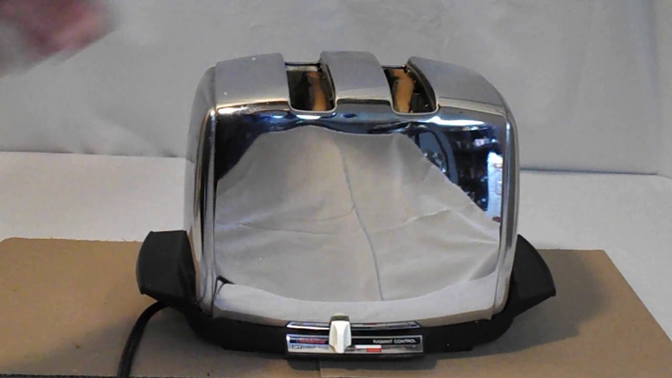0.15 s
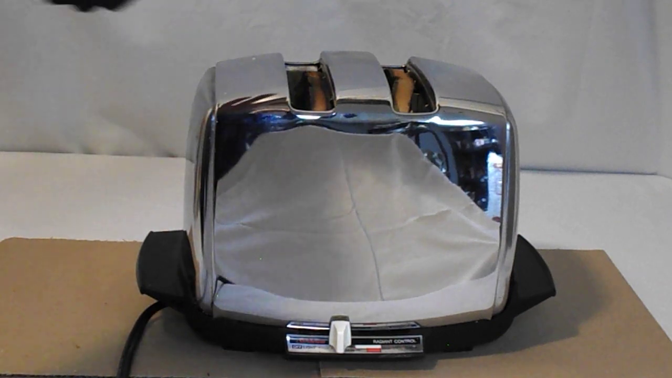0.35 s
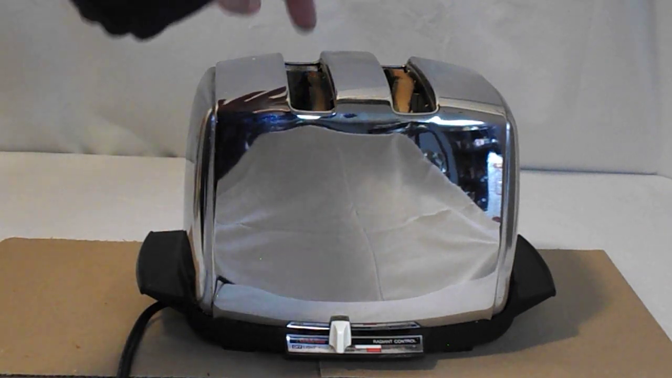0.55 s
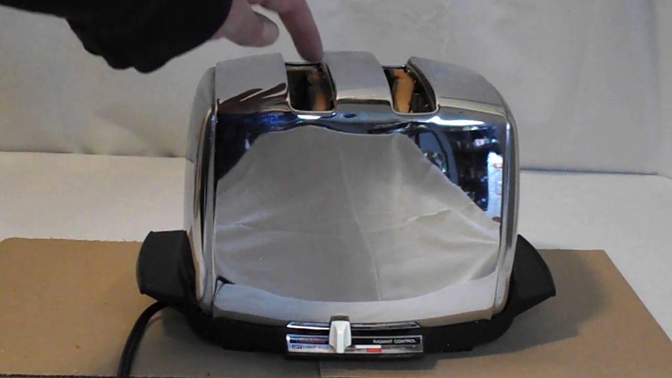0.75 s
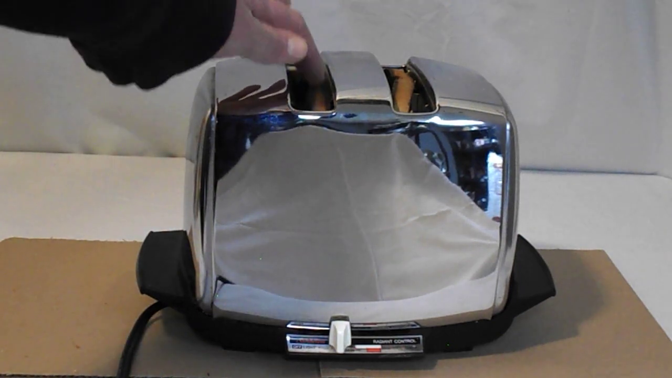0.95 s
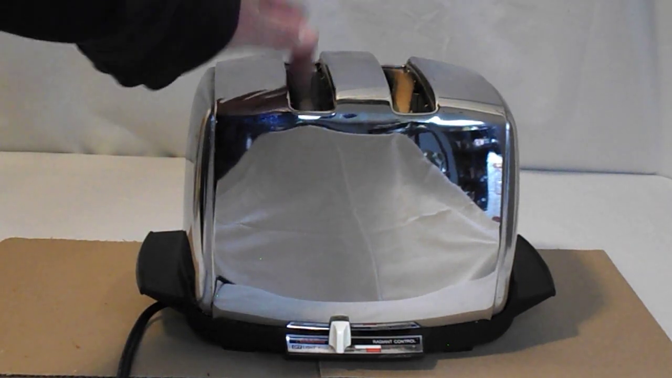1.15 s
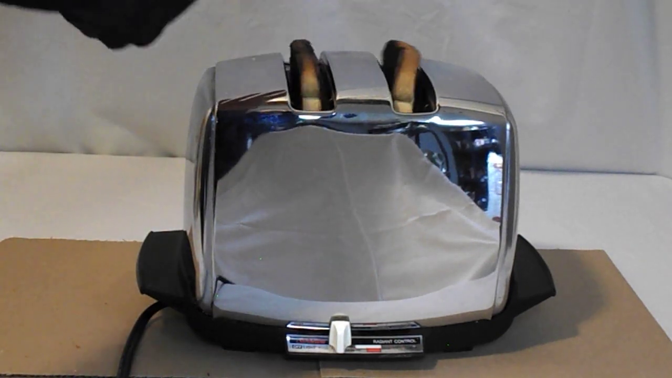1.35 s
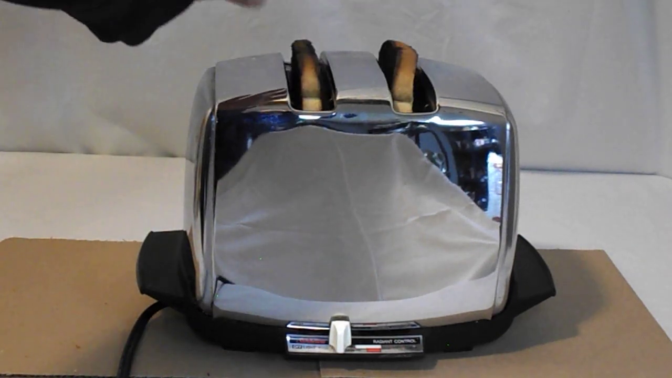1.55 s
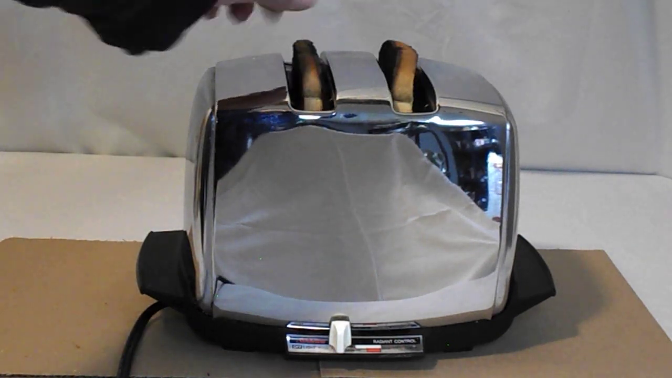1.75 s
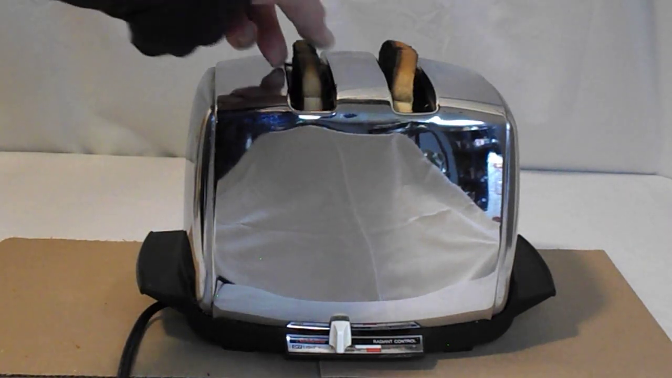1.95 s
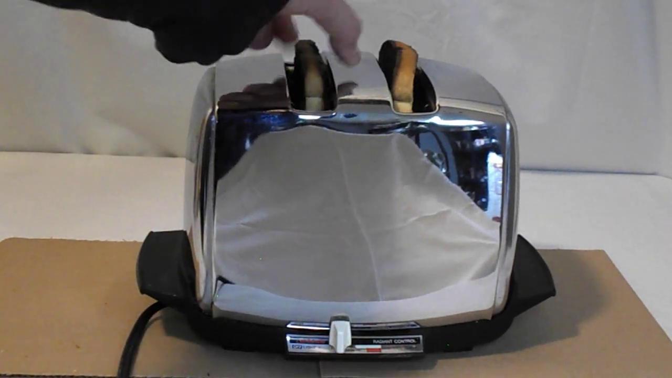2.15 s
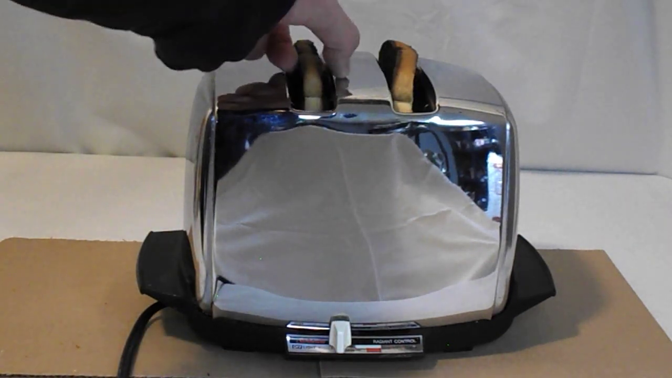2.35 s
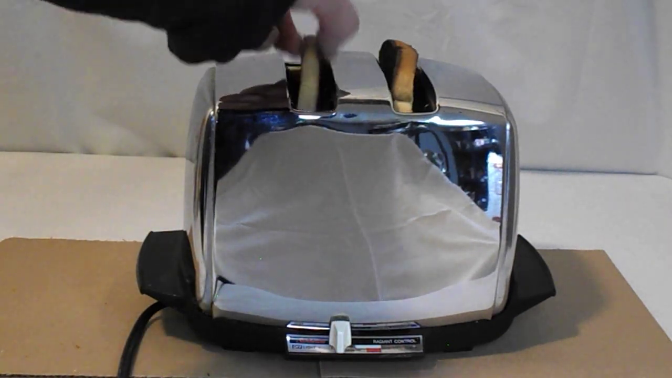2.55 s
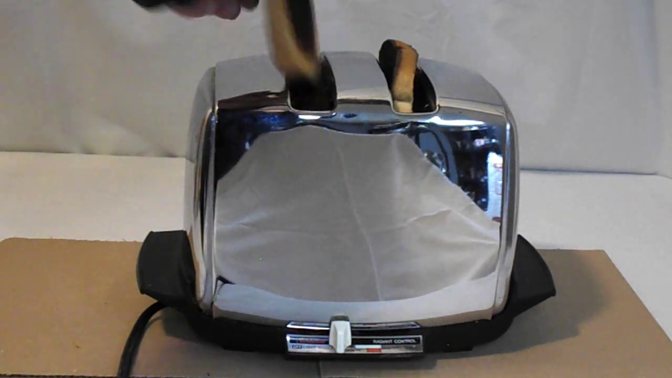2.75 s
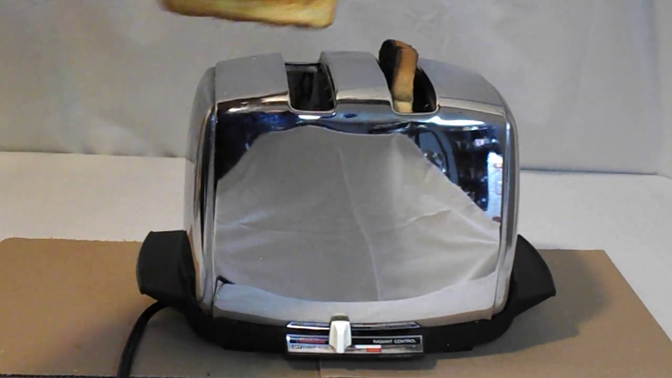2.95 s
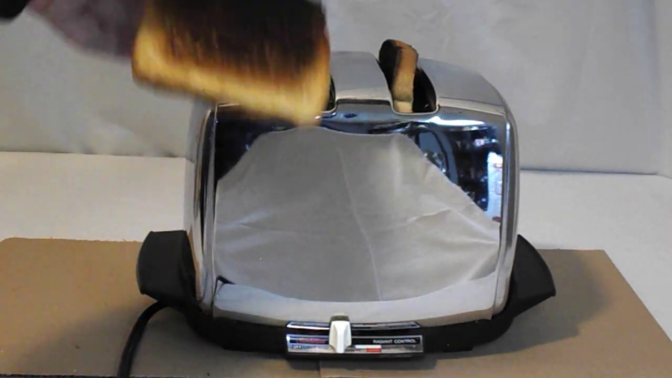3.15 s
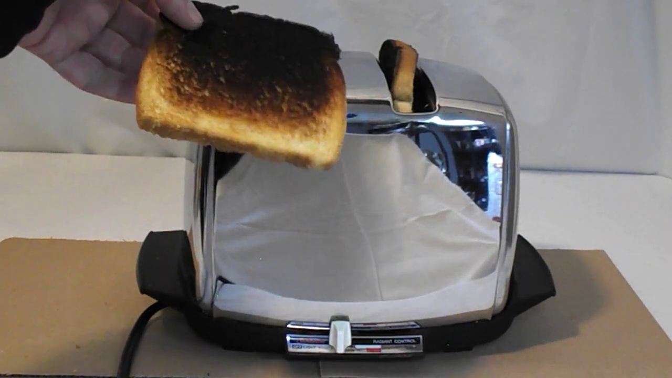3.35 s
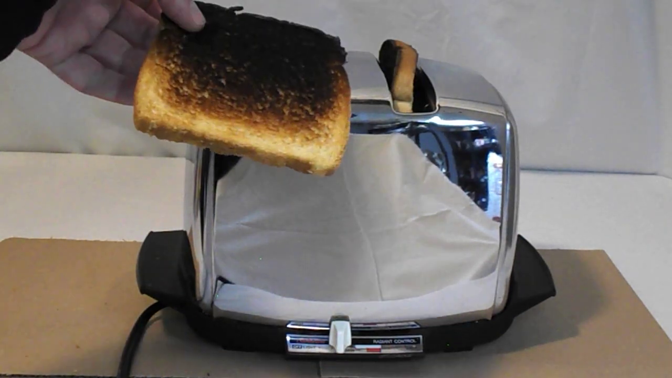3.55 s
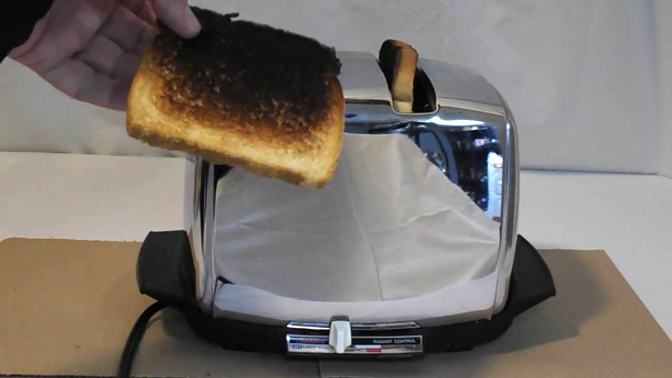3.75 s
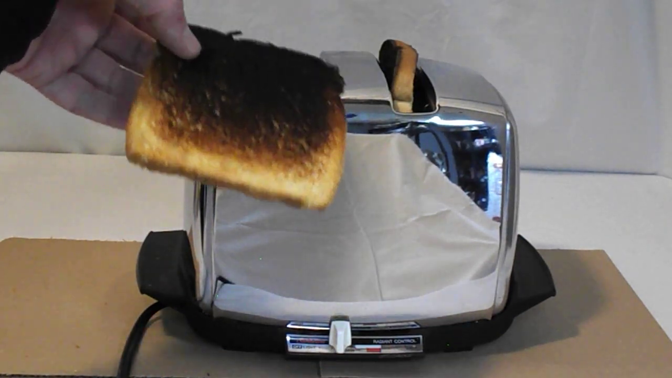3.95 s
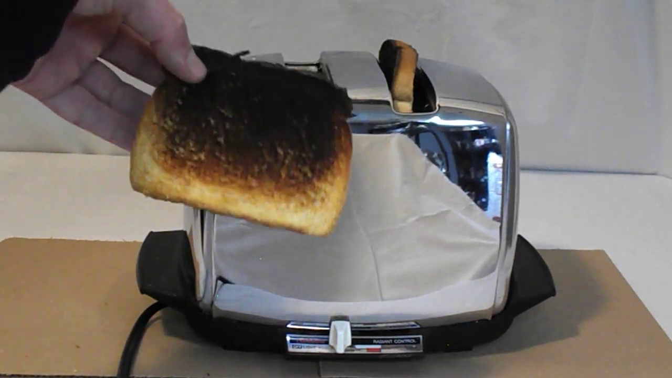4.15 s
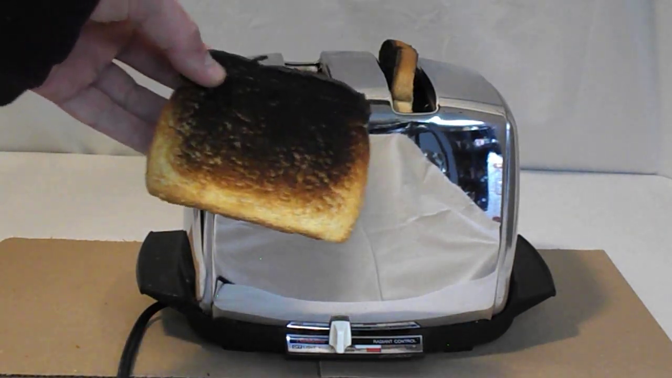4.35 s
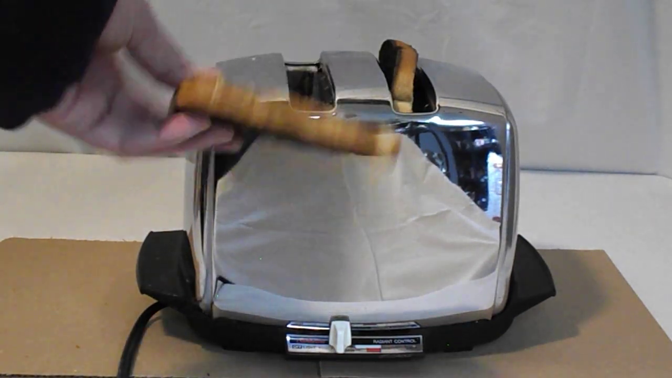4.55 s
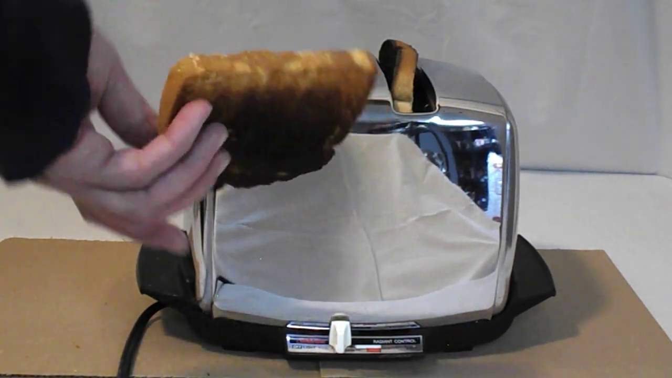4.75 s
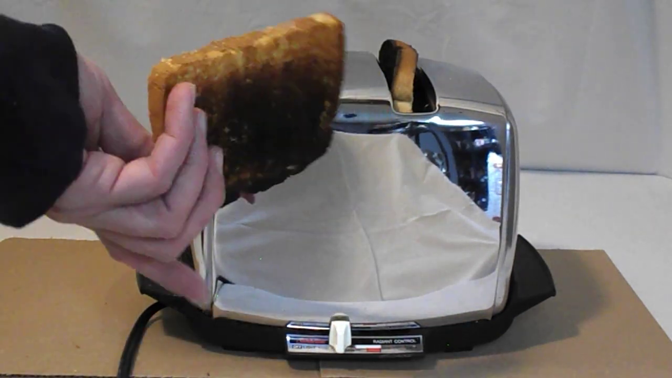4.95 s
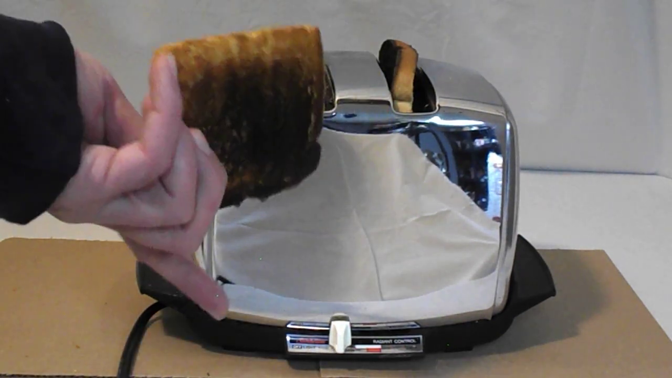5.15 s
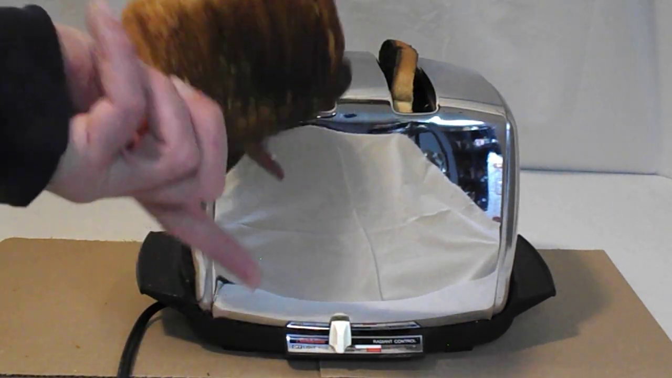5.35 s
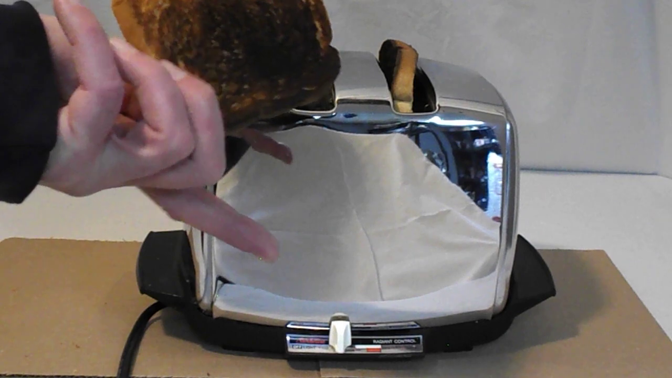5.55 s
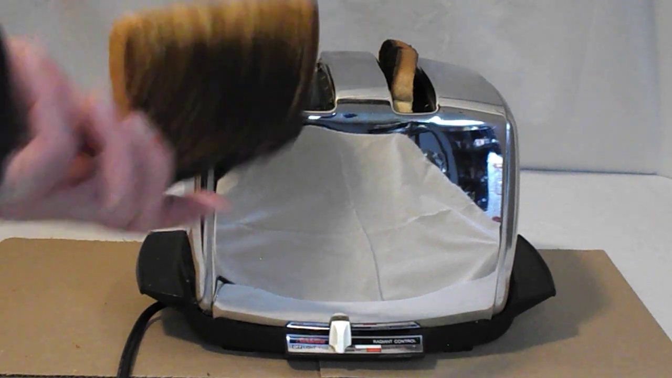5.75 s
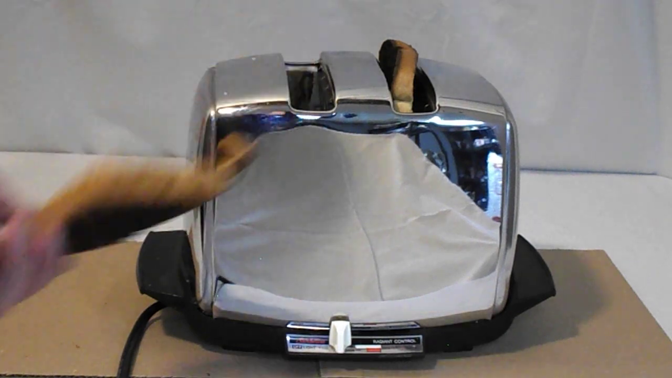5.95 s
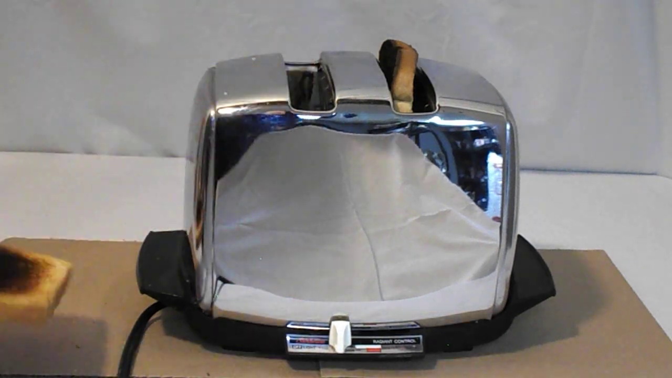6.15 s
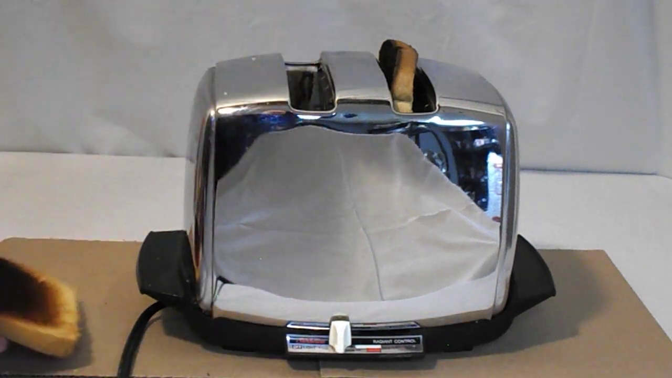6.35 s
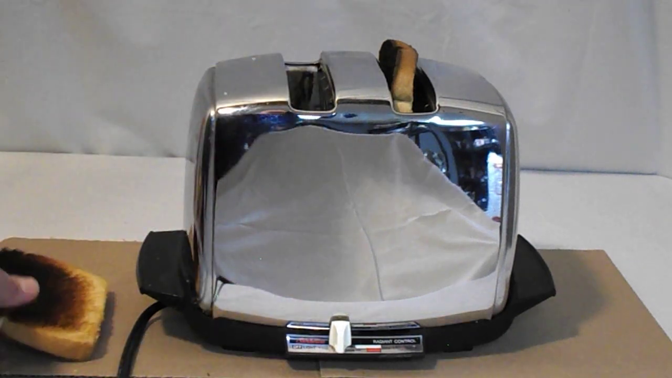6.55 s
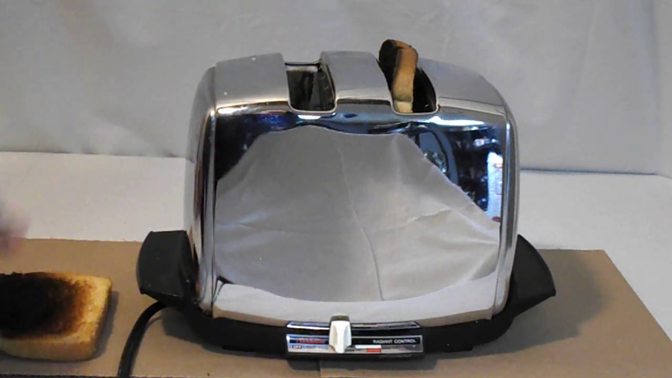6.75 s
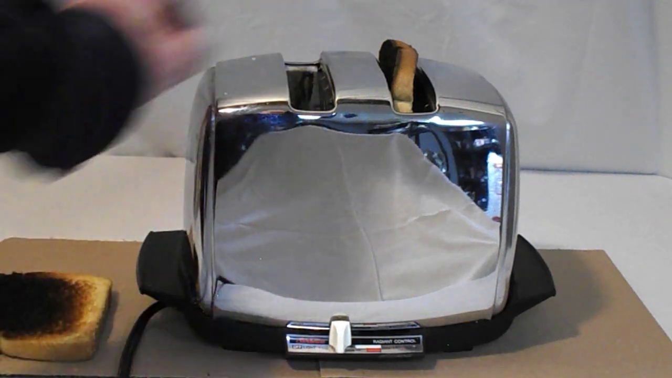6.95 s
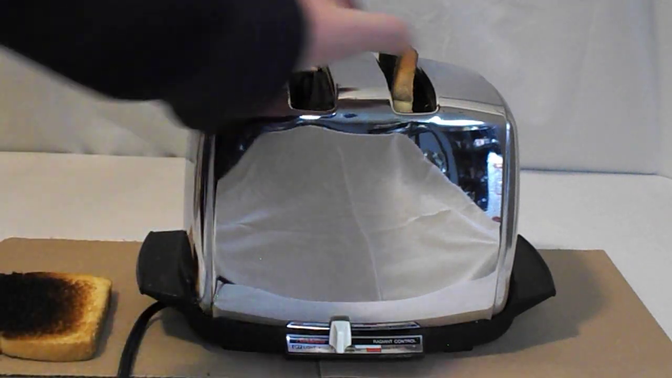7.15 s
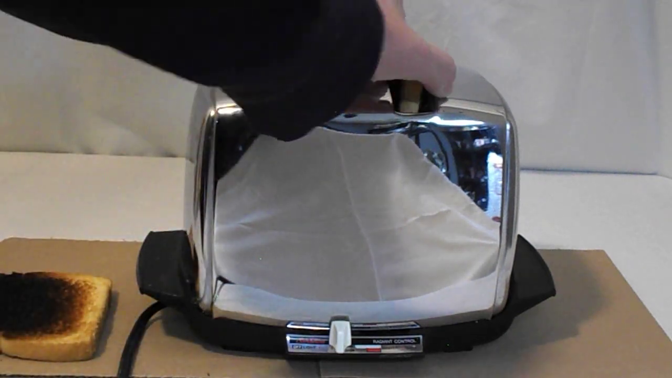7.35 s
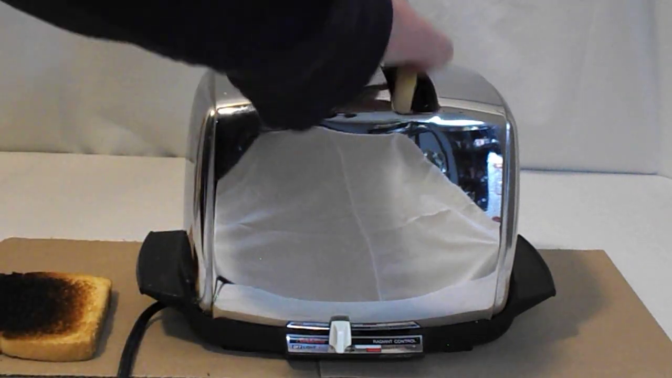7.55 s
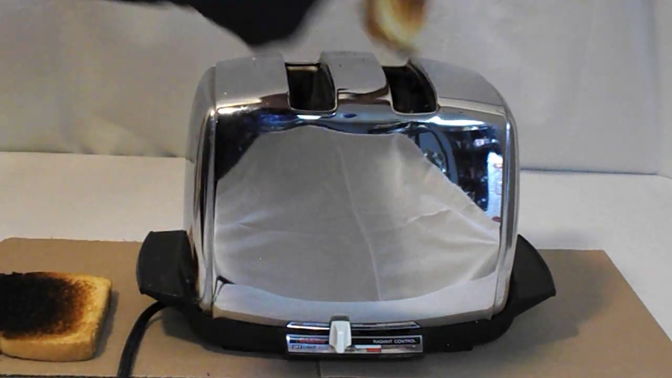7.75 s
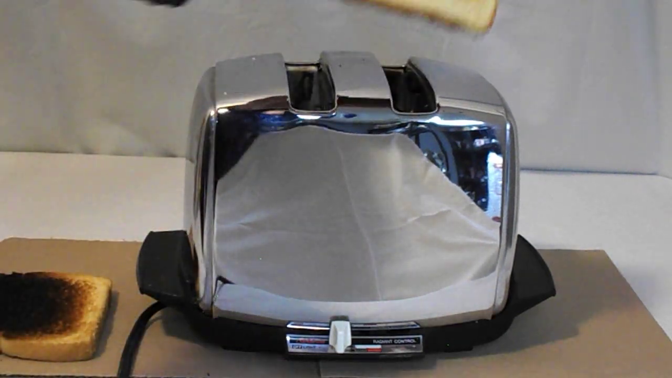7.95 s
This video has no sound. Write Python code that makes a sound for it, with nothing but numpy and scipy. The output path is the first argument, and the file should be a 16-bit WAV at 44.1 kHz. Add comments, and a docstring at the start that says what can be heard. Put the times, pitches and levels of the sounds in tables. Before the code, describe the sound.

In a small quiet room, close to the microphone, a metal toaster releases with a click and a bright squeaky rattle. A slice is knocked, scraped softly out of its wire slot, brushes the shell with a thin ring, and crackles in the fingers. It clacks and slaps onto cardboard with a dull thud, then a second slice scrapes out faster. Faint air noise and hum remain.

```python
"""A chrome toaster on a sheet of cardboard in a small quiet room: grains of rubbing drive its metal modes.
The carriage rattles and squeaks up, a finger knocks a slice, and the slice scrapes out of its slot.
Its crust brushes the shell, crackles in the hand and is set down on cardboard; the second slice comes last.
Each movement is a smooth stroke whose rub follows its speed, plus slips: grain showers that swell and die.
Behind it lie a short room tail, steady air noise and a faint hum."""
import sys
import numpy as np
from scipy import signal
from scipy.fft import rfft, irfft
from scipy.io import wavfile

SR = 44100
rng = np.random.default_rng(int(sys.argv[2]) if len(sys.argv) > 2 else 0)


def file_out(sig):
    """Save sig as 16-bit WAV at sys.argv[1]."""
    # one column per channel
    cols = np.atleast_2d(sig).T
    # limit, then scale
    lim = np.clip(cols, -1, 1)
    pcm = np.round(lim * 32767).astype(np.int16)
    wavfile.write(sys.argv[1], SR, pcm)


N = 357210

# Event levels apply before colouring, metal response and output gain; colour spectra are relative.

# latch lets go and bounces once: (t/s, level/dB)
LATCH = [(1.112, -36), (1.136, -43.5)]
# carriage rides up in one stroke: (middle t/s, length/s, level/dB)
CARRIAGE_TRAVEL = [(1.37, 0.63, -46.5)]
# carriage jerks on the way: (t/s, level/dB)
JERKS = [(1.172, -41), (1.197, -36), (1.252, -35.5), (1.272, -34), (1.315, -37), (1.354, -53),
         (1.404, -45.5), (1.432, -36)]
# finger knocks a slice against its slot: (t/s, level/dB)
KNOCKS = [(2.061, -39.5), (7.453, -52.5)]
# first slice eased out: (middle t/s, length/s, level/dB)
FIRST_PULL = [(2.79, 0.53, -59)]
# second slice gripped, drawn out fast, clears the rim: (middle t/s, length/s, level/dB)
SECOND_PULL = [(7.44, 0.36, -65.5), (7.745, .29, -44.5), (7.9, 0.3, -61)]
# first crust catches in the slot: (t/s, level/dB)
FIRST_CATCHES = [(2.584, -56.5), (2.630, -52.5), (2.732, -48.5), (2.789, -45), (2.822, -48.5), (2.871, -46)]
# second crust catches in the slot: (t/s, level/dB)
SECOND_CATCHES = [(7.611, -52), (7.668, -43.5), (7.714, -43), (7.750, -39.5), (7.806, -49)]
# carriage force spectrum: (f/Hz, level/dB)
CARRIAGE_FORCE = [(40, -39), (150, -10), (260, -2), (420, -1.5), (560, 10), (900, 4.5), (2000, 8),
                  (3300, 6.5), (4800, 3.5), (6100, 9), (7500, 0), (12000, -5.5)]
# knock force spectrum: (f/Hz, level/dB)
KNOCK_FORCE = [(40, -27), (200, -12), (420, 0.5), (720, 3), (900, -16), (1120, 11.5), (1300, -1),
               (1500, 13.5), (1900, 0.5), (2600, -8.5), (4500, -8.5), (12000, -14)]
# first slice force spectrum: (f/Hz, level/dB)
FIRST_FORCE = [(40, -35), (200, -15), (330, 9), (420, 22), (500, 9), (1000, 5.5), (1800, 9.5), (2600, 0),
               (4000, 5), (4800, 4), (6300, 6), (12000, -3.5)]
# second slice force spectrum: (f/Hz, level/dB)
SECOND_FORCE = [(40, -18), (200, -12), (330, -8), (450, 3.5), (800, -1.5), (1150, 8), (2000, 5),
                (2700, 5.5), (3600, 5), (4700, 5), (6500, 6), (12000, -8)]
# toaster body and wire rack modes, energy share before random variation: (f/Hz, share/dB, t60/s)
BODY_MODES = [(439, -13.5, 0.43), (475, -24, 0.35), (538.5, -21, 0.093), (610, -26, 0.19), (723, -21, 0.13),
              (1082, -17.5, 0.12), (1163, -19.5, 0.25), (1424, -27, 0.27), (1500, -29.5, 0.097),
              (1725, -23.5, 0.086), (1820, -35, 0.15), (2068, -23, 0.35), (2330, -19.5, 0.12),
              (2250, -40, 0.13), (2770, -16.5, 0.037), (3370, -20, 0.033), (3520, -20.5, 0.15),
              (3730, -13.5, 0.018), (4170, -23, .18), (4100, -23, 0.55), (4240, -18.5, 0.13),
              (4820, -26, 0.074), (4660, -17.5, 0.027), (5470, -47, 0.12), (5960, -32.5, 0.18),
              (5770, -46, 0.15), (5950, -41, 0.13)]
# thin guide wires plucked by the first slice, likewise: (f/Hz, share/dB, t60/s)
WIRE_MODES = [(1650, -18, 0.19), (2074, -15, 0.16), (2984, -12, 0.12), (3800, -18, 0.067),
              (3950, -14, 0.039), (4100, -11.5, 0.04), (4890, -16, 0.082), (5260, -15.5, 0.048),
              (6350, -16, 0.03), (7750, -25, .08), (9200, -14, 0.045), (10400, -17, 0.028)]
# squeaks on the guide rod: (t/s, level/dB)
SQUEAKS = [(1.200, -29), (1.258, -31.5), (1.279, -35.5), (1.439, -34)]
# two slowest shell modes: (f/Hz, t60/s)
SHELL_MODES = [(992, 5.5), (2766, 2.7)]
# blows that set the shell humming: (t/s, low mode height/dB, high mode height/dB)
SHELL_BLOWS = [(1.279, -68, -56), (3.429, -70.5, -71), (3.881, -71.5, -64)]
# crust brushes the chrome side at two places: (t/s)
TOUCHES_S = [3.428, 3.880]
# side panel modes before trim and sustain factor: (f/Hz, t60/s, first place height/dB, second/dB)
PANEL_MODES = [(1758, .7, -54, -67), (1792, .55, -59, -75), (2810, .22, -60, -65), (3560, .15, -65, -61),
               (4020, .35, -58, -61), (4056, .33, -63, -54), (4410, .2, -68, -63), (5396, .35, -69, -56),
               (5426, .4, -72, -60), (5520, .2, -52, -64), (5715, .2, -60, -66), (6020, .12, -55, -59),
               (6130, .12, -57, -56), (7300, .35, -58, -62), (7337, .42, -62, -53), (9327, .28, -52, -54),
               (9450, .15, -56, -65)]
# crust crunches against a hard edge: (t/s, level/dB)
CRUNCHES = [(1.355, -32), (6.462, -29), (7.350, -54), (7.669, -37.5)]
# fingers squeeze a slice to turn or grip it: (middle t/s, length/s, level/dB)
SQUEEZES = [(4.83, 0.57, -73), (7.39, 0.11, -61)]
# crumb spectrum: (f/Hz, level/dB)
CRUMB_COLOUR = [(800, -15), (2600, -8), (4200, -1), (6300, 0), (9500, 5), (12000, -1.5)]
# crust cracks under the fingers, before trim: (t/s, level/dB)
CRACKS = [(3.11, -53.5), (3.313, -55.5), (4.643, -54.5), (4.684, -44), (4.695, -48), (4.8638, -54),
          (4.9425, -52), (5.1143, -50.5), (5.16, -42), (5.2246, -47), (5.437, -50.5), (6.0238, -52.5),
          (6.1782, -46), (7.983, -58)]
# sleeve and fingers rub as the arm moves: (middle t/s, length/s, level/dB)
ARM_MOVES = [(.25, 1.3, -69), (3.15, 0.38, -66.5), (4.74, 0.44, -66), (5.1, 1, -70), (5.84, 0.45, -69),
             (6.15, 0.62, -73.5), (7.42, 0.39, -67), (8.0, 0.45, -72)]
# crust spectrum: (f/Hz, level/dB)
CRUST_COLOUR = [(500, -50), (1500, -5.5), (3000, -0.5), (4800, 6), (6500, -0.5), (12000, -6.5)]
# slice taps down on an edge, tips over and rocks: (t/s, level/dB)
TAPS = [(6.462, -27.5), (6.502, -29.5), (6.736, -41), (6.770, -44), (6.783, -29), (6.8205, -35.5),
        (6.830, -37.5), (6.865, -44)]
# its face slaps flat on the sheet: (t/s, level/dB)
SLAP = [(6.7815, -21)]
# before it tips, its edge skids on the cardboard: (t/s, level/dB)
SKID = [(6.505, -40)]
# edge snags during the skid: (t/s, level/dB)
SNAGS = [(6.528, -39.5), (6.598, -40.5), (6.666, -43)]
# slice weight thuds into the sheet: (t/s, level/dB)
THUDS = [(6.463, -51), (6.598, -51), (6.781, -43), (6.838, -55)]
# tap and slap spectrum: (f/Hz, level/dB)
TAP_COLOUR = [(40, -26), (200, -27), (700, -10.5), (1300, -5.5), (1950, 6), (2300, 8), (2800, -3.5),
              (3700, -1.5), (4500, 1.5), (5300, 3), (6500, -4), (12000, -6.5)]
# skid and snag spectrum: (f/Hz, level/dB)
SLIDE_COLOUR = [(40, -30), (150, -13), (300, -4), (600, -3), (1000, -4), (1500, 8.5), (2200, 8.5),
                (2900, 4), (5000, 6), (7000, 5), (12000, -4)]
# cardboard thud spectrum: (f/Hz, level/dB)
CARDBOARD_COLOUR = [(25, -35), (50, -22), (90, -9), (125, -3), (165, 1), (240, 0), (330, 0), (480, -6.5),
                    (800, -10.5), (2000, -26.5)]
# room air spectrum: (f/Hz, density/dB per Hz, relative)
ROOM_TONE = [(20, -22.5), (35, -23), (55, -3.5), (90, 0), (130, 0), (190, 4), (300, 2), (500, -1.5),
             (1000, -6), (2300, -12.5), (4500, -15.5), (7000, -22), (12000, -22)]
# steady hum before output gain: (f/Hz, rms level/dB)
HUM = [(120, -75), (524, -77.5), (991, -82.5)]
# treble notch centres: (f/Hz)
NOTCHES_HZ = [7000, 8500, 10000]

RUB_POWER = 1.78  # rub amplitude grows as this power of speed
CATCH_RISE_S, CATCH_T60_S = 0.008, 0.11


def toaster():
    """Carriage and slices rub on the rack, which drives the hollow metal body."""
    rack = metal(BODY_MODES, direct_db=-0.5, rattle_db=-4.0, rattle_t60_s=0.12)
    wires = metal(BODY_MODES + WIRE_MODES, direct_db=-6.0, rattle_db=-5.0, rattle_t60_s=0.13)

    carriage = slips(LATCH, 0.0033, 0.042, per_s=3700, spread_db=2.5, body=rack)
    carriage += strokes(CARRIAGE_TRAVEL, per_s=5000, spread_db=4.0, body=rack)
    carriage += slips(JERKS, 0.0045, 0.19, per_s=9000, spread_db=3.0, body=rack)

    knock = slips(KNOCKS, 0.002, 0.048, per_s=8100, spread_db=4.5, snap=0.29, body=rack)

    first = strokes(FIRST_PULL, per_s=1500, spread_db=4.0, body=wires)
    first += slips(FIRST_CATCHES, CATCH_RISE_S, CATCH_T60_S, per_s=1800, spread_db=0, body=wires)

    second = strokes(SECOND_PULL, per_s=5000, spread_db=4.5, body=rack)
    second += slips(SECOND_CATCHES, CATCH_RISE_S, CATCH_T60_S, per_s=6600, spread_db=2.5, body=rack)

    slices = colour(first, FIRST_FORCE) + colour(second, SECOND_FORCE)
    return colour(carriage, CARRIAGE_FORCE) + colour(knock, KNOCK_FORCE) + slices


def metal(modes, direct_db, rattle_db, rattle_t60_s, vary_db=1.5):
    """Metal body: each response draws new mode strengths; the many weak modes merge into a rattle."""
    t = seconds(0.5)
    rings = np.array([from_db(db) * unit_energy(ring(t, hz, t60_s)) for hz, db, t60_s in modes])

    def response():
        """Direct click, modes and rattle for one contact point."""
        signs = rng.choice([-1, 1], len(rings))
        strengths = signs * from_db(vary_db * rng.standard_normal(len(rings)))
        rattle = unit_energy(rng.standard_normal(len(t)) * decay(t, rattle_t60_s))
        direct = from_db(direct_db) * (t == 0)
        return direct + strengths @ rings + from_db(rattle_db) * rattle
    return response


def strokes(rows, per_s, spread_db, body=None):
    """Steady rubbing: speed is half a sine per movement and sets the strength of the grains."""
    t, level = np.arange(N) / SR, np.zeros(N)
    for middle_s, length_s, db in rows:
        moving = np.abs(t - middle_s) < length_s / 2
        speed = np.abs(np.cos(np.pi * (t[moving] - middle_s) / length_s))
        level[moving] += from_db(db) * speed ** RUB_POWER
    rub = level * grains(per_s, spread_db)
    return through(rub, body()) if body else rub


def slips(rows, rise_s, t60_s, per_s, spread_db, snap=0.0, body=None):
    """Catch and release: a grain shower swells and dies, with a hard contact (snap) at its top."""
    out, shower = np.zeros(N), grains(per_s, spread_db)
    for s, db in rows:
        start = int(s * SR)
        t = seconds(rise_s + t60_s)[:N - start]
        shape = np.minimum(t / rise_s, decay(np.maximum(t - rise_s, 0), t60_s))
        contacts = unit_energy(shape * shower[start:start + len(t)])
        contacts[np.argmax(shape)] += snap
        burst = from_db(db) * np.linalg.norm(shape) * unit_energy(contacts)
        if body:  # new response for each slip
            burst = signal.fftconvolve(burst, body())[:N - start]
        out[start:start + len(burst)] += burst
    return out


def grains(per_s, spread_db):
    """Tiny contacts of random size and sign at random moments; rms 1."""
    sizes = from_db(spread_db * np.minimum(rng.exponential(1, N), 4))
    signs = rng.choice([-1, 1], N)
    present = rng.random(N) < per_s / SR
    return unit_energy(sizes * signs * present) * np.sqrt(N)


def squeaks(hz=4800.0, width_hz=240.0):
    """Stick and slip on the guide rod pours into one narrow resonance."""
    mode = ring(seconds(0.1), hz, np.log(1000) / (np.pi * width_hz))
    force = slips(SQUEAKS, 0.0035, 0.13, per_s=8000, spread_db=0.8, snap=0.2)
    return through(force, unit_energy(np.diff(mode)))


def shell():
    """The whole shell hums on for seconds after a blow, in its two slowest modes."""
    out = np.zeros(N)
    for s, *heights_db in SHELL_BLOWS:
        start = int(s * SR)
        t = np.arange(N - start) / SR
        for (hz, t60_s), db in zip(SHELL_MODES, heights_db):
            out[start:] += from_db(db) * ring(t, hz, t60_s)
    return out


def side_panel(rub_db=-53.5, rub_t60_s=0.14, swell_s=0.0049, trim_db=-1.0, sustain=1.21):
    """A light touch rubs briefly and rings the chrome; the place sets the mode heights."""
    touches = [(s, rub_db) for s in TOUCHES_S]
    out = colour(slips(touches, swell_s, rub_t60_s, per_s=6000, spread_db=5.5), CRUST_COLOUR)
    t = seconds(1)
    for place, s in enumerate(TOUCHES_S):
        rings = np.zeros(len(t))
        for hz, t60_s, *heights_db in PANEL_MODES:
            rings += from_db(trim_db + heights_db[place]) * ring(t, hz, sustain * t60_s)
        start = int(s * SR)
        out[start:start + len(t)] += rings * (1 - np.exp(-t / swell_s))
    return out


def crumbs():
    """Dry crumbs break off a dragged, squeezed or crunched crust: bright ticks that miss the body."""
    ticks = from_db(-6.0) * strokes(CARRIAGE_TRAVEL, per_s=250, spread_db=13.0)
    ticks += from_db(-6.0) * strokes(FIRST_PULL, per_s=120, spread_db=10.0)
    ticks += from_db(-12.0) * strokes(SECOND_PULL, per_s=180, spread_db=13.0)
    ticks += slips(CRUNCHES, 0.002, 0.048, per_s=5200, spread_db=5.0)
    ticks += strokes(SQUEEZES, per_s=240, spread_db=9.0)
    return colour(ticks, CRUMB_COLOUR)


def handling(crack_trim_db=-1.5, brittle=0.5):
    """Brittle crust cracks in the grip, brightened against the rub of sleeve and fingers."""
    cracks = from_db(crack_trim_db) * slips(CRACKS, 0.003, 0.068, per_s=2600, spread_db=1.0)
    cracks = signal.lfilter([1, -brittle], [1], cracks)  # treble tilt
    rub = strokes(ARM_MOVES, per_s=3000, spread_db=4.5)
    return colour(cracks + rub, CRUST_COLOUR)


def setting_down():
    """The stiff slice clacks and slides; the cardboard answers with a low thud."""
    taps = slips(TAPS, 0.0018, 0.038, per_s=12000, spread_db=0.8, snap=0.18)
    taps += slips(SLAP, 0.0018, 0.0046, per_s=11000, spread_db=0, snap=0.98)
    slide = slips(SKID, 0.01, 0.79, per_s=3100, spread_db=2.5)
    slide += slips(SNAGS, 0.011, 0.081, per_s=3100, spread_db=0)
    thuds = slips(THUDS, 0.0043, 0.23, per_s=3000, spread_db=2.0)
    return colour(taps, TAP_COLOUR) + colour(slide, SLIDE_COLOUR) + colour(thuds, CARDBOARD_COLOUR)


def room(x, wet_db=-17.5, t60_s=0.32, gap_s=0.0034):
    """Soft furnishings leave a short faint tail: decaying noise after a gap."""
    t = seconds(1)
    tail = rng.standard_normal(len(t)) * decay(t, t60_s) * (t > gap_s)
    return x + from_db(wet_db) * through(x, unit_energy(tail))


def room_tone(air_db=-61.5):
    """Steady air noise with a faint mains and fan hum."""
    t = np.arange(N) / SR
    out = from_db(air_db) * colour(rng.standard_normal(N), ROOM_TONE)
    for hz, rms_db in HUM:
        out += np.sqrt(2) * from_db(rms_db) * np.sin(2 * np.pi * (hz * t + rng.random()))
    return out


def colour(x, spectrum, size=8192):
    """Causal (minimum-phase) filter with the given spectrum and unit power gain for white noise."""
    hz, db = np.transpose(spectrum)
    grid_hz = np.maximum(np.fft.rfftfreq(size, 1 / SR), 1)
    magnitude = from_db(np.interp(np.log(grid_hz), np.log(hz), db))
    cepstrum = irfft(np.log(magnitude))
    cepstrum[1:size // 2] *= 2  # fold to minimum phase
    cepstrum[size // 2 + 1:] = 0
    return through(x, unit_energy(irfft(np.exp(rfft(cepstrum)))))


def ring(t, hz, t60_s):
    """One decaying mode: a sine under an envelope that starts at 1."""
    return np.sin(2 * np.pi * hz * t) * decay(t, t60_s)


def decay(t, t60_s):
    """Exponential fall of 60 dB in t60_s."""
    return np.exp(-np.log(1000) * t / t60_s)


def through(x, response):
    """Convolve, cut to the length of the scene."""
    return signal.fftconvolve(x, response)[:N]


def unit_energy(x):
    """Scale to unit energy: as a response, passes white noise at the same power."""
    return x / np.sqrt(np.sum(x ** 2) + 1e-20)


def seconds(length_s):
    """Time axis in seconds."""
    return np.arange(int(length_s * SR)) / SR


def from_db(db):
    """Decibels to amplitude gain."""
    return 10 ** (np.asarray(db) / 20)


def scene():
    """Sum all sources at one microphone; the tone bypasses the room tail."""
    near = toaster() + squeaks() + shell() + side_panel() + crumbs() + handling() + setting_down()
    return (room(near) + room_tone())[None, :]


def record(dry, notch_width_hz=2250.0, cutoff_hz=12050, gain_db=1.0):
    """Sound path: three broad treble notches, a steep top cut and a gain."""
    for hz in NOTCHES_HZ:
        dry = signal.lfilter(*signal.iirnotch(hz, hz / notch_width_hz, fs=SR), dry)
    top_cut = signal.cheby2(16, 60, cutoff_hz, fs=SR, output="sos")  # 60 dB down from cutoff_hz
    return from_db(gain_db) * signal.sosfilt(top_cut, dry)


dry = scene()
out = record(dry)
file_out(out)
```